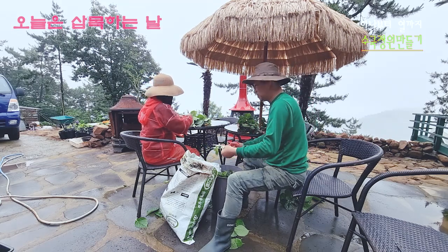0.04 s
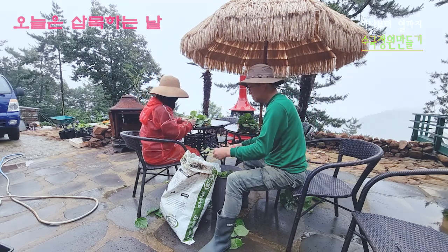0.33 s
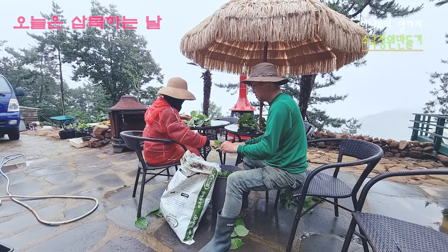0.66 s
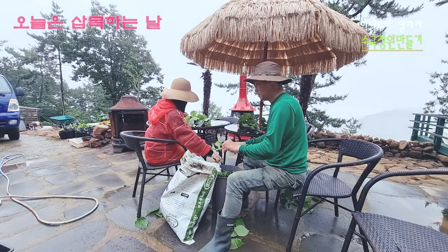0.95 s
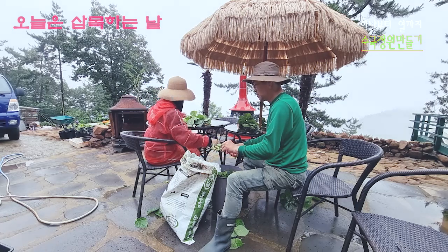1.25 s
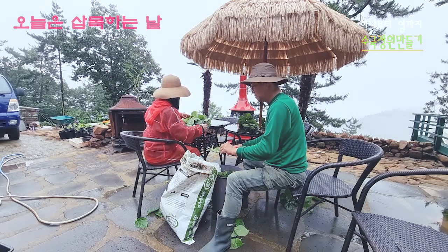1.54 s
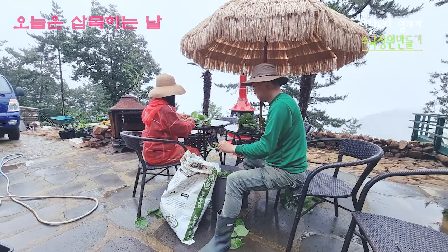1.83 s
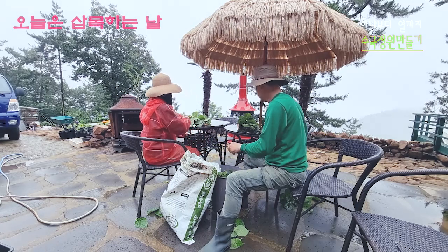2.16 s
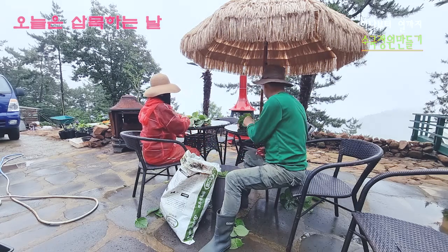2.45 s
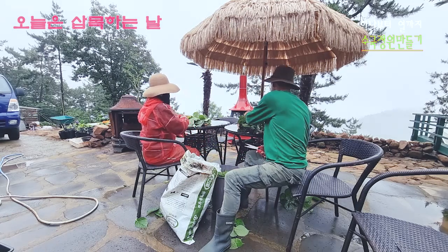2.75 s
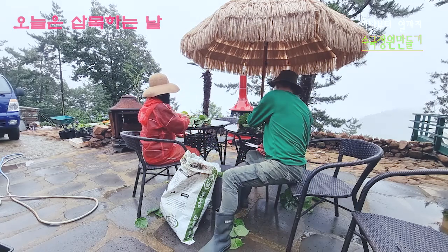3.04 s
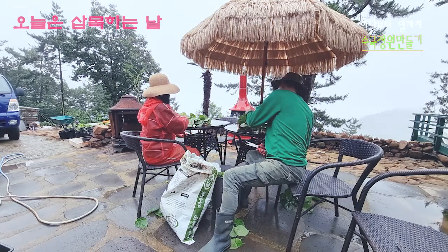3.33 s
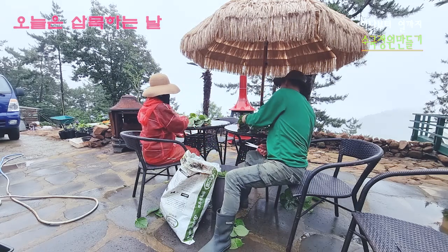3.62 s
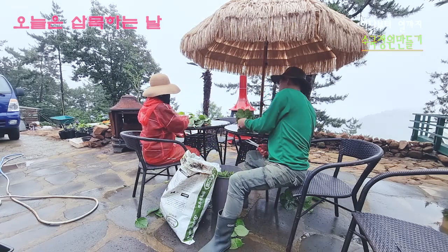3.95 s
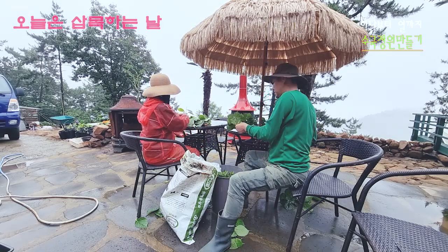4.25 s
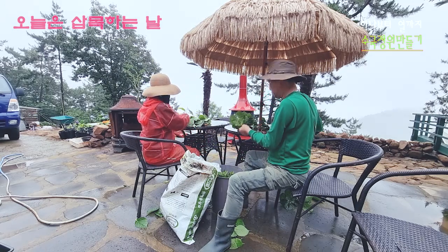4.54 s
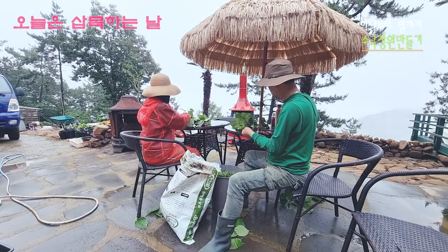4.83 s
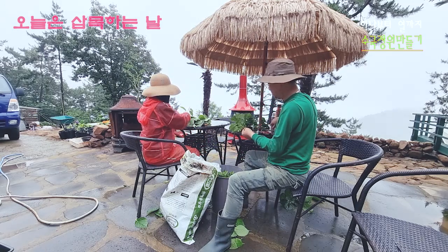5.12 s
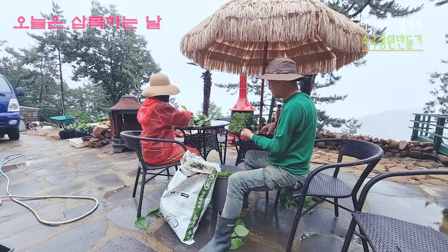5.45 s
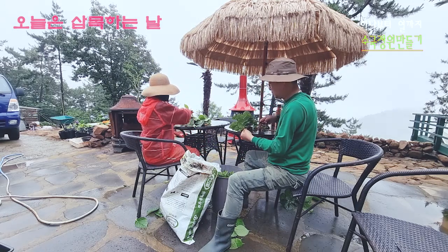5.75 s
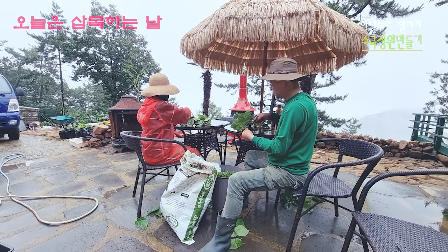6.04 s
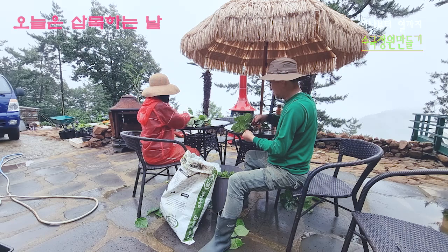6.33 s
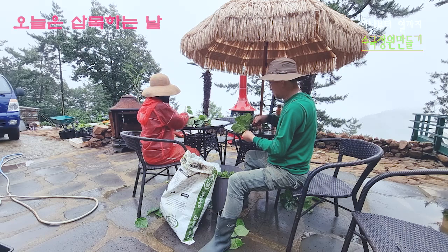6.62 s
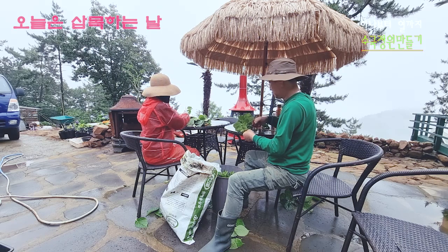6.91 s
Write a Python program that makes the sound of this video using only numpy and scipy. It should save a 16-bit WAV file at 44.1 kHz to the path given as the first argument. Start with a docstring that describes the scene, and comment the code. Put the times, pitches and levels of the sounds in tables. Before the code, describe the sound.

On a quiet open patio, garden shears snip stems at irregular moments, with popping stalks and brief tearing leaves. Later, metal squeaks on a garden table and something hard is set down with a loud, ringing double clank that echoes faintly. Two sharp snips follow. Small birds whistle softly in the trees over gentle outdoor air, a low hum and slight wind on the microphone.

```python
"""Over soft outdoor air, a low hum and small birds whistling in the trees, two people trim leafy stems
on an open stone patio: shears snip, stalks pop and leaves tear, each a brief, damped vibration or hiss.
Near five seconds metal squeaks on the metal garden table, and something hard is set down with a clank
that excites the table's modes. Half a second later a far wall reflects it. Last come two more snips,
while a bird repeats its arching call."""
import sys
import numpy as np
from scipy import signal
from scipy.fft import rfft, irfft, next_fast_len
from scipy.io import wavfile
from scipy.ndimage import map_coordinates

SR = 44100
rng = np.random.default_rng(int(sys.argv[2]) if len(sys.argv) > 2 else 0)


def bounce(signal):
    """Save signal as a 16-bit WAV file at the path given by the first command-line argument."""
    frames = np.transpose(np.atleast_2d(signal))
    limited = np.clip(frames, -1, 1)
    pcm = np.round(limited * 32767).astype(np.int16)
    wavfile.write(sys.argv[1], SR, pcm)


N = 307818


def amp(db):
    """Decibels to amplitude ratio."""
    return 10 ** (np.asarray(db) / 20)

def unit(x):
    """Normalisation to rms 1."""
    return x / np.sqrt(np.mean(x ** 2) + 1e-20)

def along(points, hz):
    """Interpolation of (frequency_hz, value) points on a logarithmic frequency axis."""
    f, v = np.transpose(points)
    return np.interp(np.log(hz + 1), np.log(f + 1), v)

def seconds(length):
    """A sampled time axis."""
    return np.arange(int(length * SR)) / SR

def wobble(rate, size):
    """Random modulation: a smooth curve with rate knots a second."""
    return map_coordinates(rng.standard_normal(int(size * rate / SR) + 4), [np.arange(size) * rate / SR])

def filtered(x, response):
    """Linear filtering: the spectrum of x times a frequency response."""
    size = x.shape[-1]
    m = next_fast_len(size + SR // 4)
    return irfft(rfft(x, m) * response(np.fft.rfftfreq(m, 1 / SR)), m)[..., :size]

def noise(shape_db, size):
    """Two uncorrelated noises of rms 1, coloured by a dB function of frequency."""
    return unit(filtered(rng.standard_normal((2, size)), lambda hz: amp(shape_db(hz))))

def resonance(hz, centre_hz, width_hz):
    """Magnitude response of a damped resonator."""
    return 1 / np.hypot(1, 2 * (hz - centre_hz) / width_hz)

def tone(hz, t, apart_rad):
    """Phase difference: a sine of rms 1 reaches the two microphones out of step."""
    phase = rng.uniform(0, 2 * np.pi) + np.array([[.5], [-.5]]) * apart_rad * rng.choice([-1, 1])
    return np.sqrt(2) * np.sin(2 * np.pi * hz * t + phase)

def panned(x, left_db):
    """A level difference between the channels leans a sound to one side."""
    return x * amp(np.array([[.5], [-.5]]) * left_db)

def add(track, start_s, sound):
    """Superposition of a sound on the track."""
    start = max(round(start_s * SR), 0)
    part = sound[:, :max(N - start, 0)]
    track[:, start:start + part.shape[1]] += part

def scattered(x, delay_s, t60_s):
    """Diffuse reflection: a delayed, exponentially decaying response of unit energy."""
    t = seconds(1)
    tail = rng.standard_normal((2, len(t))) * amp(-60 * t / t60_s)
    tail /= np.linalg.norm(tail, axis=1, keepdims=True)
    return signal.fftconvolve(x, np.pad(tail, ((0, 0), (int(delay_s * SR), 0))), axes=1)[:, :N]


# spectrum of the outdoor air: frequency_hz, level_db
AIR_SPECTRUM = [(15, -50), (25, -22.5), (53, -5), (103, -4), (169, -9.5), (219, -10.5), (250, -12.5),
                (370, -11.5), (411, -15.5), (712, -20), (833, -24), (3000, -26.5), (7310, -37.5),
                (13000, -52)]
# its stereo width: frequency_hz, side_over_mid_db
AIR_WIDTH = [(60, -10.5), (120, -17), (200, -8.5), (380, -1.5), (700, 7.5), (1290, 7), (2400, -1),
             (15000, 1.5)]
def air(level_db=-61):
    """Stationary noise: soft outdoor air whose coherence between the channels varies with frequency."""
    mid, side = noise(lambda f: along(AIR_SPECTRUM, f) - 20 * np.log10(1 + (f / 12800) ** 12), N)
    side = filtered(side, lambda f: amp(along(AIR_WIDTH, f)))
    return panned(amp(level_db) * np.array([mid + side, mid - side]), -0.74)


# spectrum of wind on the microphones: frequency_hz, level_db
WIND_SPECTRUM = [(15, -17), (35, -7), (60, 0.5), (90, -4), (160, -16.5), (400, -39.5), (1000, -88.5)]
# gusts: peak_s, level_db, half_length_s
GUSTS = [(0.031, -58.5, 0.25), (0.532, -58, .15), (0.962, -59.5, .12), (1.256, -62, 0.124),
         (1.722, -69, .18), (3.132, -68.5, .2), (3.75, -70, .1)]
def breeze(calm_db=-79, buffet_db=2):
    """Pressure fluctuation: light gusts swell over a faint draught and rumble on the microphones."""
    t = np.arange(N) / SR
    gusts = sum(amp(db) * np.exp(-((t - peak_s) / half_s) ** 2) for peak_s, db, half_s in GUSTS)
    mid, side = noise(lambda f: along(WIND_SPECTRUM, f), N)
    rumble = np.array([mid + .7 * side, mid - .7 * side])
    return panned((amp(calm_db) + gusts) * amp(buffet_db * wobble(4.01, N)) * rumble, -6.5)


def hum(pitch_hz=99.83, level_db=-68.8):
    """Amplitude and phase modulation: a low hum wavers in level and pitch."""
    t = np.arange(N) / SR
    return amp(level_db + 2.2 * wobble(9, N)) * tone(pitch_hz, t + .001 * wobble(9, N), .2)


# kinds of whistle, by name:
# start_hz, turn_hz, end_hz, loudest_hz, glide_s, drop_s, drop_change_db, flutter_share
WHISTLES = {"chirp": (2950, 2780, 2400, 2650, .04, .075, 0, .05),
            "slur": (3550, 3780, 2900, 3750, .062, .036, -3, .005),
            "rise": (3700, 5030, 3100, 4950, .124, .028, -14, .005),
            "arch": (3250, 7350, 2800, 4800, .12, .041, 3, .018)}
def whistle(kind, fade_s=.022, loss_db_per_octave=18):
    """Source and filter: a tone glides, turns and drops, loudest near the throat's resonance."""
    start_hz, turn_hz, end_hz, loudest_hz, glide_s, drop_s, change_db, flutter = WHISTLES[kind]
    t = seconds(glide_s + 2.4 * drop_s)
    glide_left = np.maximum(1 - t / glide_s, 0) ** 1.65
    dropped = 1 - np.exp(-(np.maximum(t - glide_s, 0) / drop_s) ** 1.7)
    hz = turn_hz + (start_hz - turn_hz) * glide_left + (end_hz - turn_hz) * dropped
    loss_db = loss_db_per_octave * np.abs(np.log2(hz / loudest_hz))
    level_db = 2.6 * wobble(88.7, len(t)) - loss_db + change_db * dropped
    fade = np.clip(np.minimum(t, t[-1] - t) / fade_s, 0, 1)
    cycles = np.cumsum(hz * (1 + flutter * wobble(400, len(t)))) / SR
    return fade * amp(level_db) * np.sin(2 * np.pi * cycles)


# bird calls: start_s, level_db, kind
BIRD_CALLS = [(0.1, -63.5, "chirp"), (0.53, -61.5, "slur"), (0.78, -66.5, "chirp"), (0.905, -54, "rise"),
              (1.24, -70, "chirp"), (3.25, -58.5, "slur"), (3.596, -53.5, "rise"), (3.99, -60, "arch"),
              (4.352, -61, "arch"), (4.679, -58.5, "arch"), (5.314, -61, "arch"), (5.633, -63, "arch"),
              (5.965, -60.5, "arch"), (6.306, -60.5, "arch"), (6.65, -60, "arch")]
# paths through the trees: delay_s, t60_s, level_db
FOLIAGE_PATHS = [(0, .022, -3.3), (.012, .15, -4.5), (.03, .7, -8.5)]
def birds():
    """Multipath scattering: thin whistles blur among the trees."""
    calls = np.zeros((2, N))
    for start_s, db, kind in BIRD_CALLS:
        add(calls, start_s, amp(db) * whistle(kind)[None])
    return sum(amp(db) * scattered(calls, delay_s, t60_s) for delay_s, t60_s, db in FOLIAGE_PATHS)


def far_echoes(x, round_trips_s=(.514, .558)):
    """Delayed reflection: two faces of a far wall each return a dull copy, and the trees reverberate."""
    first_s, second_s = round_trips_s
    returns = scattered(x, first_s, t60_s=.054) + amp(-8) * scattered(x, second_s, t60_s=.04)
    wall_response = [(300, -40), (900, -34), (1800, -30.5), (3500, -29), (7000, -36), (14000, -50)]
    tree_response = [(500, -37), (3000, -37), (10000, -48)]
    wall = filtered(returns, lambda f: amp(along(wall_response, f)))
    trees = filtered(scattered(x, delay_s=.14, t60_s=1.7), lambda f: amp(along(tree_response, f)))
    return wall + trees


# soft low bumps: start_s, level_db, t60_s
BUMPS = [(4.944, -56.5, 0.54), (5.05, -47, 0.34), (5.383, -51, 0.33)]
# their spectrum: frequency_hz, level_db
BUMP_SPECTRUM = [(60, -25.5), (140, -5.5), (270, -1.5), (400, -11), (800, -24), (3000, -64.5)]
def bumps(attack_s=.0023):
    """Exponentially damped low noise: toneless bumps come with the knocks and just after them."""
    out, t = np.zeros((2, N)), seconds(.16)
    for start_s, db, t60_s in BUMPS:
        mid, side = noise(lambda f: along(BUMP_SPECTRUM, f), len(t))
        envelope = np.minimum(t / attack_s, 1) * amp(db - 60 * t / t60_s)
        add(out, start_s, envelope * np.array([mid + .27 * side, mid - .19 * side]))
    return panned(out, -2.5)


# leaves tearing and a sleeve brushing: start_s, level_db, length_s, tilt_db_per_octave
TEARS = [(0.088, -50.5, 0.104, 1.8), (0.266, -63.5, 0.052, 1.5), (1.58, -53, 0.062, 3.5),
         (1.748, -62, 0.099, 0), (2.333, -54.5, 0.054, -1), (3.379, -58, 0.064, -6.5),
         (3.691, -56.5, 0.11, -4), (3.841, -66, 0.049, -1)]
# spectrum of their hiss: frequency_hz, level_db
LEAF_SPECTRUM = [(400, -4), (1200, -3), (2200, -1.5), (3000, 2.5), (4300, -9.5), (7500, -7), (11000, -19.5),
                 (16000, -17.5)]
def tears():
    """Fracture noise: leaf fibres part in a quick, grainy swell of hiss; gentle brushing is duller."""
    out, t = np.zeros((2, N)), seconds(.25)
    for start_s, db, length_s, tilt in TEARS:
        progress = 3 * t / length_s  # the swell peaks at 1
        swell = progress ** 2 * np.exp(2 - 2 * progress)
        hiss = noise(lambda f: along(LEAF_SPECTRUM, f) + tilt * np.log2(np.maximum(f, 400) / 3000), len(t))
        add(out, start_s, swell * amp(db + 2.4 * wobble(600, len(t))) * hiss)
    return out


# thick stalks popping: start_s, level_db, pitch_hz, thud_hz, thud_db, overtone_db
STALK_POPS = [(0.296, -50, 1180, 534, -0.5, -2), (0.303, -40.5, 1110, 538, -6.5, -10),
              (0.314, -48.5, 1374, 543, 1, -15.5), (1.7802, -40.5, 1710, 635, -3, -11),
              (1.791, -49, 1770, 646, 2, -2), (2.353, -45.5, 1616, 895, -10.5, 1)]
# spectrum of the thud: frequency_hz, level_db
THUD_SPECTRUM = [(100, -11.5), (250, -2), (550, -4.5), (950, -4.5), (1400, -11), (2000, -9), (2900, -13.5),
                 (4000, -20.5), (8000, -34), (16000, -49)]
def stalks(overtone_hz=2930, attack_s=.0011, t60_s=.061):
    """Damped tube resonance: a hollow stalk gives way with a dull thud and three rough tones."""
    out, t = np.zeros((2, N)), seconds(.13)
    for start_s, db, pitch_hz, thud_hz, thud_db, overtone_db in STALK_POPS:
        uneven = t + 6e-5 * wobble(220, len(t))  # the tube's pitch shifts as it is crushed
        tube = tone(pitch_hz, uneven, 1.53) + amp(overtone_db) * tone(overtone_hz, uneven, 1.8)
        tube += amp(thud_db - 2) * tone(thud_hz, uneven, .64)
        mid, side = noise(lambda f: along(THUD_SPECTRUM, f), len(t))
        thud = amp(thud_db) * np.array([mid + .6 * side, mid - .6 * side])
        envelope = np.minimum(t / attack_s, 1) * amp(db - 60 * t / t60_s)
        add(out, start_s, envelope * (tube + thud))
    return out


# blades snapping shut: start_s, level_db, pitch_hz, brightness_db
SNIPS = [(0.034, -59, 2855, -3), (0.118, -49.5, 2970, 9.5), (0.867, -54.5, 2680, 1.5),
         (1.591, -53, 2900, 6.5), (1.642, -48, 2620, -14), (5.025, -32.5, 2600, 1),
         (5.9793, -35.5, 2880, -1.5), (6.873, -52.5, 2780, 4), (6.8859, -36, 2610, 3.5)]
def snips(click_t60_s=.012):
    """Impact excitation: the blades' broad resonances sound in a click; the cut stem crunches on."""
    def treble(f):
        return (.293 * resonance(f, 5800, 1060) ** 2 + .236 * resonance(f, 8400, 2200) ** 2
                + .047 * resonance(f, 18000, 7000))

    out, t = np.zeros((2, N)), seconds(.17)
    click = np.minimum(t / .0006, 1) * amp(5.5 - 60 * t / click_t60_s)
    crunch = np.exp(-np.abs((t - .018) / .017) ** 1.4)
    for start_s, db, pitch_hz, bright_db in SNIPS:
        blade_db = lambda f: 20 * np.log10(resonance(f, pitch_hz, 710) ** 2 + amp(bright_db) * treble(f))
        envelope = click + crunch * amp(-13 + 1.2 * wobble(400, len(t)))
        add(out, start_s, amp(db) * envelope * noise(blade_db, len(t)))
    return panned(out, -0.99)


# partials of metal sliding on the table: pitch_hz, level_db
SQUEAK_PARTIALS = [(1044, -20.5), (1389, -2), (2347, -14), (2606, -17.5), (5448, -18.5)]
def squeak(start_s=4.722, hold_s=.022, t60_s=.11):
    """Frictional excitation: metal slides on the table top and sings briefly over a scraping hiss."""
    out, t = np.zeros((2, N)), seconds(.11)
    song = sum(amp(db) * tone(hz, t, 1.4) for hz, db in SQUEAK_PARTIALS)
    song *= amp(-40.5 + .7 * wobble(156, len(t)))
    spectrum = [(500, -6.5), (1400, -1.5), (3000, .5), (4000, -12), (5500, -5), (10000, -10.5), (15000, -6)]
    scrape = noise(lambda f: along(spectrum, f), len(t)) * amp(-45.5 + 1.5 * wobble(500, len(t)))
    envelope = np.minimum(t / .0038, 1) * amp(-60 * np.maximum(t - hold_s, 0) / t60_s)
    add(out, start_s, envelope * (song + scrape))
    return panned(out, -3)


# knocks on the table: start_s, ring_db, rattle_db, low_hz, high_hz, ring_time_share, rattle_treble_db
KNOCKS = [(4.9445, -23.5, -34, 1400, 1914, 0.73, 4), (5.035, -36.5, -45.5, 2490, 9000, 0.95, 1),
          (5.0494, -17.5, -20.5, 151, 12000, 0.9745, 0)]
# modes of the metal table: pitch_hz, level_db, t60_s, left_over_right_db
TABLE_MODES = [(255, -33, .4, -3), (437, -26, .48, -8), (665, -18, .16, -2), (735, -16, .36, -10),
               (921, -16, .31, -3), (1048, -13, .28, 6), (1206, -3.5, .27, 5), (1379, -14, .24, 2),
               (1400, -19, .2, 0), (1526, -10, .21, -10), (1760, -22, .12, 0), (1877, -14, .25, -8),
               (2248, -14, .15, 3), (2341, -2.5, .14, -3), (2598, -11, .16, 3), (2660, -9, .14, -4),
               (2830, -6, .15, -8), (3080, -16, .19, -6), (3365, -13, .16, -4), (3540, -14, .14, 7),
               (5251, -21, .19, 3), (5852, -20, .13, 0), (6479, -23, .17, 3), (7156, -23, .15, -4)]
def table_knocks(leak=.1, treble_hz=4700):
    """Modal superposition: main modes ring over many small ones; light knocks excite a narrower band."""
    out, t = np.zeros((2, N)), seconds(.5)
    for start_s, ring_db, rattle_db, low_hz, high_hz, time_share, treble_db in KNOCKS:
        # modes outside the knock's band keep the share leak of their amplitude
        low_cut = lambda f: leak + (1 - leak) / (1 + (low_hz / (f + 1)) ** 30)
        high_cut = lambda f: leak + (1 - leak) / (1 + (f / high_hz) ** 10)
        ring = np.zeros((2, len(t)))
        for hz, db, t60_s, left_db in TABLE_MODES:
            mode = panned(tone(hz, t + 1.5e-5 * wobble(60, len(t)), 1.7), left_db)
            ring += mode * low_cut(hz) * high_cut(hz) * amp(db - 60 * t / (t60_s * time_share))
        cloud = panned(amp(rattle_db) * rattle(t, low_cut, time_share, treble_db, treble_hz), -0.88)
        build_up = 1 - np.exp(-t / (.0038 * time_share ** 2))
        add(out, start_s, build_up * (amp(ring_db) * ring + cloud))
    return out


# spectrum of the table's many small modes: frequency_hz, level_db
RATTLE_SPECTRUM = [(150, -29), (400, -14.5), (700, -9.5), (1100, -1), (1700, -5.5), (2700, -4.5),
                   (3500, -5), (4300, -15), (5600, -12), (8000, -18), (11000, -25), (16000, -28.5)]
def rattle(t, low_cut, time_share, treble_db, treble_hz):
    """Modal overlap: the table's small modes, bunched at random, merge into a decaying noise."""
    grid_hz = np.arange(0, SR / 2, 70)
    bunch_db = 4 * rng.standard_normal(len(grid_hz))
    modes_db = lambda f: along(RATTLE_SPECTRUM, f) + np.interp(f, grid_hz, bunch_db)
    cloud = noise(lambda f: modes_db(f) + 20 * np.log10(low_cut(f)), len(t))
    brightened = filtered(cloud, lambda f: amp(treble_db * (1 - 1 / (1 + (f / treble_hz) ** 8))))
    return brightened * amp(2.1 * wobble(240, len(t)) - 60 * t / (.2 * time_share))


def scene():
    """Superposition of the work at the table, its near and far reflections, and the background."""
    work = snips() + stalks() + tears() + squeak() + table_knocks() + bumps()
    near_reflections = amp(-17) * scattered(work, delay_s=.0052, t60_s=.099)
    return work + near_reflections + far_echoes(work) + birds() + air() + breeze() + hum()


def record(dry, peak_hz=12905, peak_db=2.5, limit_hz=15900):
    """Microphone resonance lifts the top treble; a steep low-pass then limits the band."""
    coloured = filtered(dry, lambda hz: amp(peak_db * resonance(hz, peak_hz, width_hz=1200) ** 2))
    return filtered(coloured, lambda hz: 1 / (1 + (hz / limit_hz) ** 120))


dry = scene()
out = record(dry)
bounce(out)
```